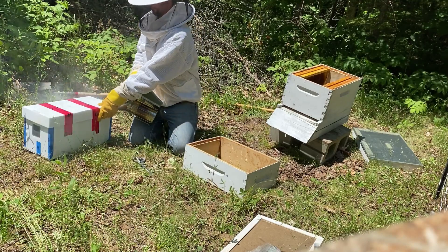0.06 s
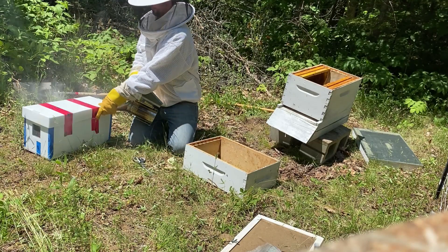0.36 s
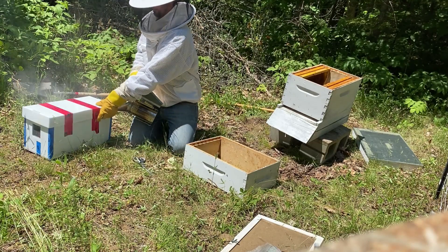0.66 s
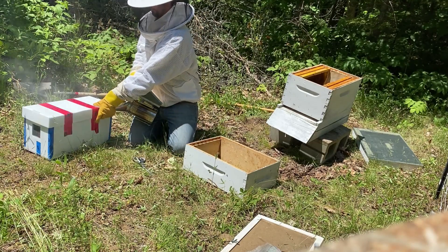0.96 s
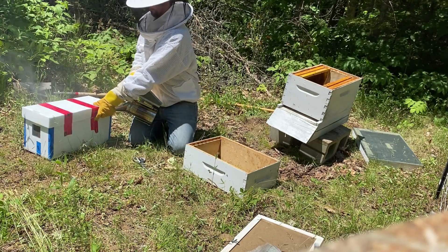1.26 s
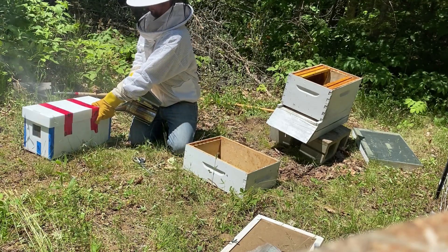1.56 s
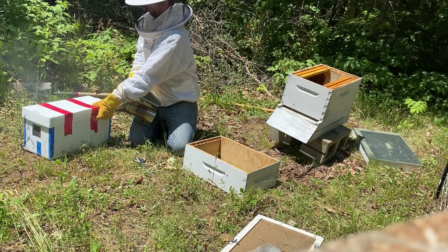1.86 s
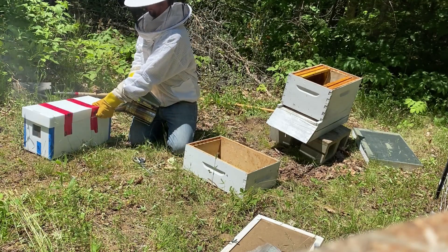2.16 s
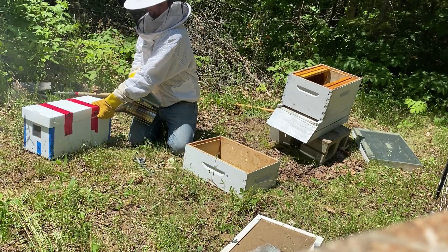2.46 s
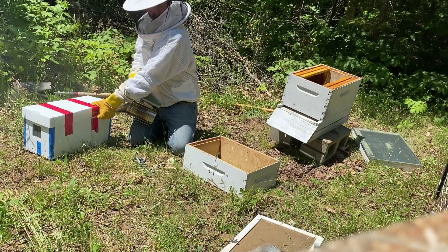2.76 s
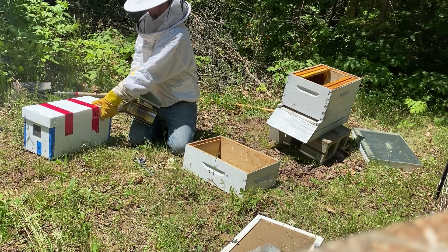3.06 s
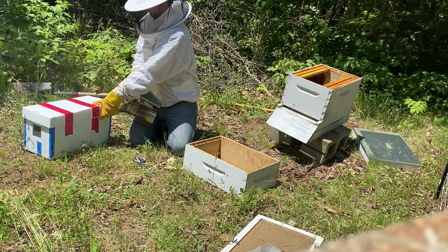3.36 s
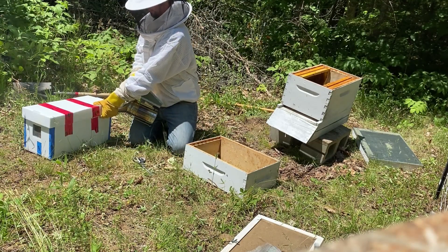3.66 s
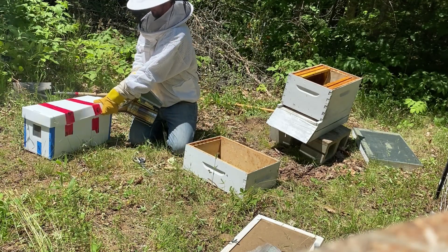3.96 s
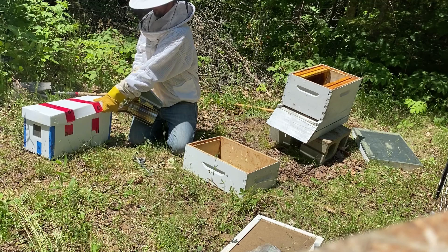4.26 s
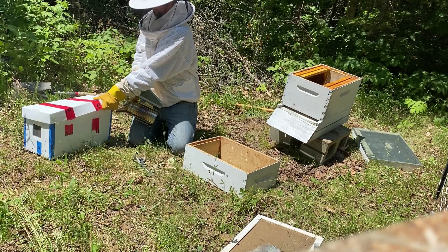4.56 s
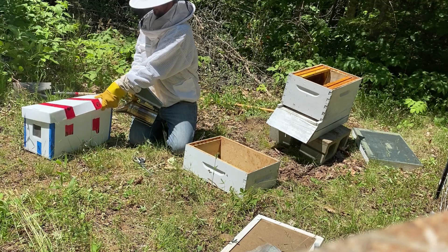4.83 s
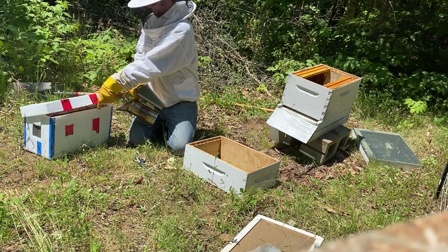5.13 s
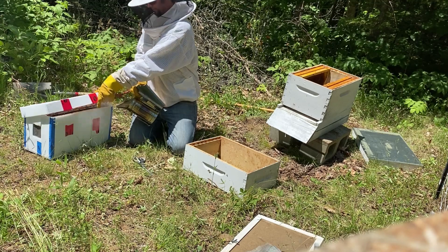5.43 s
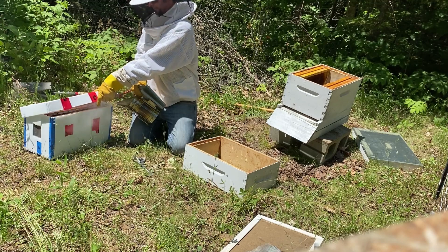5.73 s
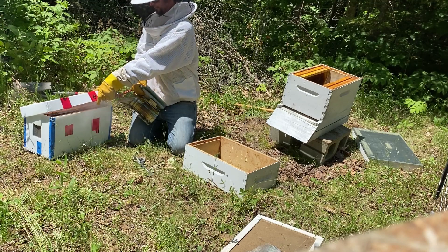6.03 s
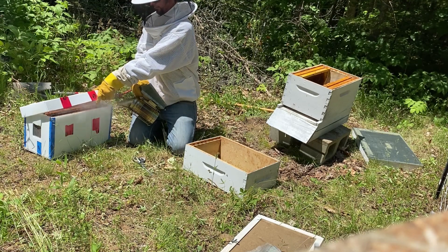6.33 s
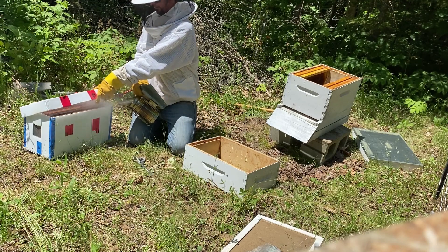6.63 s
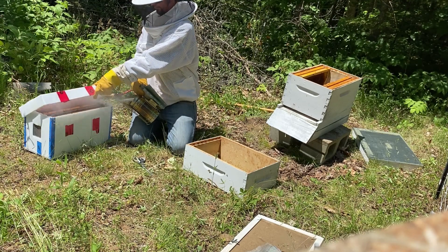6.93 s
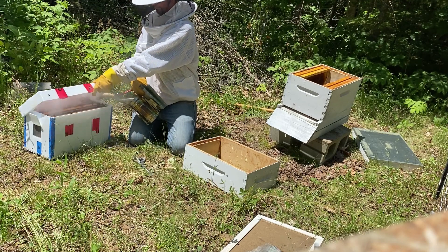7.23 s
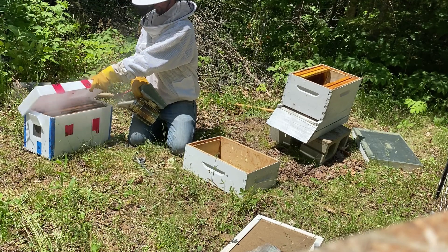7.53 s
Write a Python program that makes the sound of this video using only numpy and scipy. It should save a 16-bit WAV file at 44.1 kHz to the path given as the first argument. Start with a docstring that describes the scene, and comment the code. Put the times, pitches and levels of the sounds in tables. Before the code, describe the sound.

Bees hum softly and distant birds trill while tape crackles and a hive box lid is prised up with hollow knocks.

```python
"""The lid of a light hive box rubs, snaps and knocks as a beekeeper peels off its tape and prises it up.
Stick-slip friction shakes the panels, and each blow rings their damped modes. Inside, the wingbeats of
the colony make a hum that brightens as the gap widens; a smoker puffs a hissing jet of air into it.
At the edge of the wood one bird trills, another warbles and a distant buzzy phrase passes once,
all scattered by trunks and leaves over faint outdoor air."""
import sys
import numpy as np
from scipy import signal
from scipy.fft import rfft, irfft, next_fast_len
from scipy.io import wavfile
from scipy.ndimage import uniform_filter1d

SR = 44100
rng = np.random.default_rng(int(sys.argv[2]) if len(sys.argv) > 2 else 0)


def dump_mix(stems):
    """Bounce the given channels to the path in sys.argv[1] as a 16-bit WAV at rate SR."""
    frames = np.atleast_2d(stems).T  # one column per channel
    limited = np.clip(frames, -1, 1)  # hard clip at full scale
    pcm = np.round(limited * 32767).astype(np.int16)
    wavfile.write(sys.argv[1], SR, pcm)


N = 334719

# spectrum of the outdoor air: frequency_hz, gain_db
AIR_SPECTRUM = [(20, -22.5), (55, 1), (90, 0), (150, -3.5), (400, -10.5), (900, -20.5), (2000, -23),
                (4500, -31.5), (7500, -36), (15000, -48)]
# the part of the air that differs between the ears: frequency_hz, gain_db
AIR_SIDE_SPECTRUM = [(60, -10.5), (300, -2.5), (1500, 0.5), (6000, -8.0), (12000, -10.0)]
# colour of the hive's echo from the trees: frequency_hz, gain_db
ECHO_SPECTRUM = [(200, -8.5), (1500, -1.5), (5500, 4), (8000, -1.5), (15000, -9.5)]
# differences between the ears for the hive: frequency_hz, left_minus_right_db, left_lead_rad
EAR_DIFFERENCES = [(60, 3, .15), (248, 1.5, 0.29), (900, 4, 1.2), (2000, 2.5, 0.94), (3930, -3, 1.2),
                   (7680, -3.5, 2.33), (8900, 0, 1.57), (12200, -0.5, .1)]

# a buzzy phrase from deeper in the wood: time_s, pitch_hz, level_db
BUZZ_PHRASE = [(2.48, 4790, -69), (2.53, 5460, -64), (2.62, 5540, -66), (2.72, 5200, -63.5),
               (2.8, 5260, -70.5), (2.84, 4990, -89)]
# the warbler swoops to a pitch and back: turn_s, each_way_s, outer_hz, turn_hz, level_db
WARBLE_SWOOPS = [(0.586, 0.029, 5250, 3980, -67.5), (.81, 0.06, 4285, 2540, -61.5),
                 (1.42, 0.087, 4100, 2765, -63.5), (1.715, 0.086, 4480, 2326, -62.5),
                 (2.931, 0.083, 2490, 3563, -66.5), (4.006, 0.028, 3040, 4500, -59),
                 (4.305, .04, 2400, 3655, -65.5), (5.088, 0.034, 5500, 3370, -62),
                 (5.188, .062, 5240, 2800, -62.5), (7.274, .03, 3300, 4800, -72.5)]
# its downward slurs: start_s, length_s, first_hz, level_db
WARBLE_SLURS = [(0.611, 0.054, 5070, -69), (1.18, 0.1, 3750, -65), (1.796, 0.043, 4630, -60),
                (1.98, 0.058, 4850, -62), (2.055, .065, 3310, -66), (2.43, 0.037, 3160, -64),
                (4.065, 0.072, 2930, -64.5)]
# its held, barely gliding notes: start_s, length_s, first_hz, last_hz, level_db
WARBLE_HOLDS = [(1.53, 0.104, 3910, 3640, -64), (2.167, .085, 3850, 4420, -68.5),
                (2.356, 0.082, 3050, 2975, -66.5), (5.677, 0.22, 3300, 2846, -68),
                (6.441, 0.042, 4110, 3845, -67.5)]
# one syllable of the trill, a rise and a softer fall: time_s, pitch_hz, level_db
TRILL_SYLLABLE = [(0, 5100, 7), (.005, 5780, -2), (.011, 6090, 2), (.016, 6300, -9.5), (0.023, 6770, -11),
                  (.027, 6520, -39), (0.03, 6200, -20), (.037, 5500, -16), (.043, 5000, -18),
                  (.05, 4400, -18)]
# bouts of the trill: start_s, end_s, first_period_s, lengthening_per_period_s
TRILL_BOUTS = [(-.026, 2.09, .0922, .00017), (5.98, 7.56, .0908, 0)]
# one bout fades and the next swells: time_s, level_db
TRILL_ENVELOPE = [(0, -55.5), (1.2, -53.5), (2.05, -57), (5.98, -72), (6.4, -64.5), (6.85, -61.5),
                  (7.59, -60.5)]

# the colony heard through the walls: frequency_hz, gain_db
HUM_SPECTRUM = [(100, -12.5), (165, -4), (205, -2.5), (260, -3), (320, 1.5), (400, 1.5), (480, -5.5),
                (600, -10), (800, -21.5), (1500, -42)]
# course of that hum: time_s, level_db
HUM_ENVELOPE = [(0.0, -65.5), (0.59, -67), (3.21, -66.5), (3.8, -63.5), (4.57, -68), (5.39, -66),
                (6.47, -64.5), (6.66, -63.5), (7.59, -60)]
# the colony heard through the gap: frequency_hz, gain_db
SEETHE_SPECTRUM = [(300, 0), (600, 2), (750, -1), (950, 4), (1250, 5.5), (1650, -12.5), (2500, -12.5),
                   (5000, -23), (7500, -26.5), (15000, -46)]
# opening under the lid: time_s, share_of_full_gap
LID_OPENING = [(0, 0.18), (2.8, 0.13), (3.9, 0.41), (4.5, 0.095), (5.15, 0.16), (5.3, 0.4), (6.2, 0.42),
               (6.7, 0.83), (7.59, 0.96)]
# squeezes of the smoker's bellows: start_s, swell_s, level_db
BELLOWS_PUFFS = [(6.18, 0.14, -64), (6.55, 0.9, -65)]
# hiss of its nozzle: frequency_hz, gain_db
JET_SPECTRUM = [(500, -1), (1300, 9), (2500, 0), (5000, 4), (7500, -1), (10000, 1.5), (12000, -10),
                (14000, -5), (16000, -12.5)]

# pulls on the tape and brushes of the glove: start_s, hold_s, level_db
TAPE_PULLS = [(0, 0.013, -72.5), (0.41, 0.05, -66), (0.877, 0.95, -75.5), (1.261, 0.02, -63.5),
              (1.388, 0.12, -69), (2.358, 0.71, -72.5), (2.659, 0.11, -67.5), (3.817, 0.098, -63.5),
              (5.15, 0.048, -66)]
# crinkling tape and cloth: frequency_hz, gain_db
CRINKLE_SPECTRUM = [(800, -31), (2500, -1), (5500, 1), (7500, 1), (10000, -3.5), (14000, -4.5),
                    (16000, -7.5)]
# the loudest ticks of tape and dry stalks: time_s, level_db, centre_hz
LOUD_TICKS = [(1.4282, -34.5, 7830), (1.525, -38.5, 9000), (1.98, -37.5, 2700), (2.044, -45, 9000),
              (2.686, -38.5, 2500), (2.711, -41, 4500), (2.763, -36, 12000), (2.942, -40, 4000),
              (3.18, -45.5, 6000), (3.583, -43.5, 8000), (3.703, -40.5, 7750), (3.853, -30, 7000),
              (4.678, -38, 3450), (5.205, -29, 10400), (5.359, -53, 9200), (5.648, -39.5, 3000),
              (6.305, -44.5, 9000), (6.938, -40, 4500)]
# creaks of the lid: start_s, end_s, pitch_hz, level_db
LID_CREAKS = [(3.498, 3.522, 1520, -63), (5.565, 5.715, 1670, -74)]
# lid and glove rub on the box: start_s, end_s, groan_db, scratch_db
BOX_RUBS = [(0.419, 0.474, -45.5, -54.5), (1.01, 1.124, -62, -67.5), (1.798, 1.932, -56, -66),
            (1.943, 2.308, -63.5, -75), (3.015, 3.9, -69.5, -75), (3.467, 3.531, -55, -82),
            (5.154, 5.376, -56, -71), (5.519, 5.766, -56, -71), (5.86, 6.057, -55, -77),
            (6.467, 7.147, -58, -82)]
# response of the rubbed panels: frequency_hz, gain_db
GROAN_SPECTRUM = [(40, -11), (80, -5), (145, -6), (245, 3), (330, -4.5), (480, -8), (900, -34.5),
                  (3000, -57)]
# scratching on their surface: frequency_hz, gain_db
SCRATCH_SPECTRUM = [(400, 2), (1000, 6.5), (1700, 3.5), (2500, 1), (4500, -2), (8000, -11.5), (15000, -43)]
# the lid snapping past the rim: frequency_hz, gain_db
SNAP_SPECTRUM = [(500, -11), (1200, 1.5), (2500, -7), (3700, -3.5), (5700, -0.5), (7500, -4.5), (11000, -7),
                 (14000, -16), (16000, -5)]
# normal modes of the box: frequency_hz, level_db, t60_s
BOX_MODES = [(102, -21, 0.25), (184.4, 0.5, 0.11), (199, -24, .08), (238.5, -4, .09), (305.5, 2, 0.048),
             (329.6, 2.5, 0.04), (374.4, -3.5, 0.068), (438, -15, 0.028), (475, -19, 0.11),
             (560, -14.5, 0.043), (655.5, -8, 0.044), (690, -14, 0.063), (770, -20, 0.043),
             (968, -2.5, 0.025), (1160, -11, 0.027), (1390, -10, 0.017), (1580, -21, 0.012),
             (1730, -15.5, 0.016), (2225, -20.5, 0.022), (2600, -13.5, 0.013)]
# blows on the box: time_s, force_db, snap_db, rebound_db, bent_panel_pitch_ratio
BOX_BLOWS = [(0.4256, -47, -40, -55, 1.21), (.452, -38, -15, -29, 1.32), (1.145, -25.5, -56, -43, 1.084),
             (1.177, -39, -40, -49, 1.01), (1.452, -46, -60, -55, 0.9), (1.887, -46.5, -39.5, -50, .95),
             (1.978, -43.5, -46, -66, 1.07), (2.268, -45, -58, -52, 1), (2.3993, -32, -37, -57, 1.31),
             (3.099, -51.5, -66, -60, 0.88), (3.482, -59, -35, -59, .95), (3.507, -60, -45, -62, 1.28),
             (3.841, -47, -34, -58, 1.03), (3.8676, -17, -5.5, -48, 0.98), (5.2048, -36.5, -32, -40, 1),
             (6.902, -48.5, -29.5, -51, 0.89)]


def from_db(db):
    return 10 ** (np.asarray(db) / 20)


def unit_rms(x):
    return x / np.sqrt(np.mean(x ** 2) + 1e-20)


def seconds(length_s):
    return np.arange(int(length_s * SR)) / SR


def in_time(rows):
    """Each column of a curve, interpolated sample by sample."""
    times, *columns = np.transpose(rows)
    return [np.interp(np.arange(N) / SR, times, column) for column in columns]


def at_hz(rows, hz, column=1):
    """A column interpolated along a logarithmic frequency axis."""
    rows = np.array(rows)
    return np.interp(np.log(hz + 1e-3), np.log(rows[:, 0]), rows[:, column])


def add(track, start_s, sound):
    """Superposition: a sound joins the track at its start time."""
    start = round(start_s * SR)
    part = sound[max(-start, 0):N - start]
    track[max(start, 0):max(start, 0) + len(part)] += part


def filtered(x, response):
    """Linear filtering: the spectrum is multiplied by a function of frequency."""
    size = next_fast_len(x.shape[-1] + 4096)
    hz = np.fft.rfftfreq(size, 1 / SR)
    return irfft(rfft(x, size) * response(hz), size)[..., :x.shape[-1]]


def coloured(x, spectrum):
    return filtered(x, lambda hz: from_db(at_hz(spectrum, hz)))


def drift(per_s):
    """Random modulation of unit RMS, linear between Gaussian values."""
    knots = rng.standard_normal(int(per_s * N / SR) + 2)
    return unit_rms(np.interp(np.arange(N) * per_s / SR, np.arange(len(knots)), knots))


def grains(per_s, spread_db):
    """Shot noise: tiny slips of very unequal size at random moments."""
    sizes = from_db(spread_db * np.minimum(rng.exponential(1, N), 5)) * rng.choice([-1, 1], N)
    return unit_rms(sizes * (rng.random(N) < per_s / SR))


def stroke(start_s, end_s):
    """The tapered envelope of one hand movement."""
    return signal.windows.tukey(max(int((end_s - start_s) * SR), 2), 0.24)


def push(attack_s, hold_s, release_db_per_s):
    """Effort builds linearly, holds and decays exponentially."""
    t = seconds(attack_s + hold_s + 1)
    released_s = np.maximum(t - attack_s - hold_s, 0)
    return np.minimum(t / attack_s, 1) * from_db(-release_db_per_s * released_s)


def from_left(x):
    """Interaural phase and level differences: the box stands left, so that ear hears it first."""
    half = np.array([[.5], [-.5]])

    def response(hz):
        gain = from_db(half * at_hz(EAR_DIFFERENCES, hz))
        return gain * np.exp(1j * half * at_hz(EAR_DIFFERENCES, hz, column=2))
    return filtered(x, response)


def tree_scatter(x, t60_s, build_s):
    """Multiple scattering by trunks and leaves gives a decaying tail, different at each ear."""
    t = seconds(1.2)
    tail = rng.standard_normal((2, len(t))) * from_db(-60 * t / t60_s) * (1 - np.exp(-t / build_s))
    tail /= np.sqrt(np.sum(tail ** 2, axis=1, keepdims=True))
    return signal.fftconvolve(x[None], tail, axes=1)[:, :N]


def outdoor_air():
    """Partly coherent noise: faint air, alike at both ears in the bass."""
    mid, side = rng.standard_normal((2, N))
    side = coloured(side, AIR_SIDE_SPECTRUM)
    return from_db(-68) * unit_rms(coloured(mid + side * [[1], [-1]], AIR_SPECTRUM))


def buzzing_bird(swing_hz=750, swings_per_s=55):
    """Fast frequency modulation makes a buzz, so far off that only scattered sound arrives."""
    t = np.arange(N) / SR
    centre_hz, db = in_time(BUZZ_PHRASE)
    hz = centre_hz + swing_hz * np.sin(2 * np.pi * swings_per_s * t) + 200 * drift(150)
    singing = (t >= BUZZ_PHRASE[0][0]) & (t <= BUZZ_PHRASE[-1][0] + .02)
    envelope = from_db(db) * uniform_filter1d(singing * 1., size=900)
    song = envelope * np.sin(2 * np.pi * np.cumsum(hz) / SR)
    return tree_scatter(song, t60_s=0.4, build_s=0.0049) * from_db([[-1], [3]])


def whistle(hz, amplitude, burr):
    """Random frequency modulation roughens a bird's pure tone; burr is the relative deviation."""
    quaver = unit_rms(uniform_filter1d(rng.standard_normal(len(hz)), size=90))
    phase = 2 * np.pi * np.cumsum(hz * (1 + burr * quaver)) / SR
    return amplitude * signal.windows.tukey(len(hz), .2) * np.sin(phase)


def warbled_notes(turn_roundness=1.2, slur_ratio=.77):
    """Frequency glides: start, pitch course and level of each swoop, slur and held note."""
    for turn_s, way_s, outer_hz, turn_hz, db in WARBLE_SWOOPS:
        from_turn = np.abs(seconds(2 * way_s) / way_s - 1)
        yield turn_s - way_s, turn_hz * (outer_hz / turn_hz) ** (from_turn ** turn_roundness), db
    for start_s, length_s, first_hz, db in WARBLE_SLURS:
        yield start_s, first_hz * slur_ratio ** (seconds(length_s) / length_s), db
    for start_s, length_s, first_hz, last_hz, db in WARBLE_HOLDS:
        yield start_s, first_hz + (last_hz - first_hz) * seconds(length_s) / length_s, db


def warbling_bird(db_per_octave=7, upstroke_db=2.5, flutter_db=2.5):
    """Amplitude follows frequency: fluttering notes are sung harder when high and when rising."""
    song = np.zeros(N)
    for start_s, hz, db in warbled_notes():
        rising = uniform_filter1d((np.gradient(hz) > 0) * 1., size=300)
        effort_db = db_per_octave * np.log2(hz / hz.mean()) + upstroke_db * rising
        add(song, start_s, whistle(hz, from_db(db - 3 + effort_db), burr=0.02226))
    song *= from_db(flutter_db * drift(120))
    leaves = tree_scatter(song, t60_s=0.039, build_s=0.0016)   # nearby foliage smears each note
    trees = tree_scatter(song, t60_s=0.79, build_s=0.02)
    return song * from_db([[-4.5], [-.5]]) + from_db(-4.5) * leaves + trees * from_db([[.5], [2.5]])


def trill_beats(uneven_db=.8):
    """Start and level of each syllable: a periodic beat that slows in the first bout as the bird tires."""
    for start_s, end_s, period_s, lengthening_s in TRILL_BOUTS:
        while start_s < end_s:
            yield start_s, np.interp(start_s, *np.transpose(TRILL_ENVELOPE)) + uneven_db * rng.normal()
            start_s += period_s
            period_s += lengthening_s


def trilling_bird(flattening_per_db=0.00368):
    """A train of chirps: softer ones are lower in pitch and have a lower direct-to-reverberant ratio."""
    times, hz, shape_db = np.transpose(TRILL_SYLLABLE)
    t = seconds(times[-1])
    facing, scattered = np.zeros((2, N))
    for start_s, db in trill_beats():
        pitch_ratio = 1 + flattening_per_db * min(db + 57.0, 0) + rng.normal(0, 0.0053)
        tilt_db = rng.normal(0, 1.3) + .5 * (db + 70.5)   # the downstroke comes and goes
        amplitude = from_db(db + np.interp(t, times, shape_db) + tilt_db * t / times[-1])
        note = whistle(pitch_ratio * np.interp(t, times, hz), amplitude, burr=0.014)
        add(facing, start_s, note)
        add(scattered, start_s, note * from_db(-.3 * (db + 49.0)))
    direct = facing * from_db([[-11], [3]]) * [[-1], [1]]   # from the right, the ears half a cycle apart
    return direct + tree_scatter(scattered, t60_s=0.43, build_s=0.002) * from_db([[-8], [-2]])


def wings(wing_hz=205, spread=.11, bees=14):
    """Incoherent sum: each bee's wandering wingbeat is a pulse train, over a rush of air."""
    sawtooths = np.zeros(N)
    for _ in range(bees):
        beat_hz = wing_hz * np.exp(spread * rng.normal() + .04 * drift(9))
        sawtooths += (np.cumsum(beat_hz) / SR % 1 - .5) * from_db(3.84 * drift(6))
    pulses = np.diff(sawtooths, prepend=sawtooths[0])
    return unit_rms(pulses) + 0.86 * rng.standard_normal(N)


def colony(hum_gain_db=3, full_gap_db=-64.5):
    """Two transmission paths: the walls pass a dull hum, the gap under the lid a brighter seething."""
    (hum_db,), (gap,) = in_time(HUM_ENVELOPE), in_time(LID_OPENING)
    hum = from_db(hum_db + hum_gain_db) * unit_rms(coloured(wings(), HUM_SPECTRUM))
    seethe = gap * from_db(full_gap_db) * unit_rms(coloured(wings(), SEETHE_SPECTRUM))
    return hum + seethe


def smoker(flutter_db=2.1):
    """Jet noise: the bellows push a smooth hiss of air through the nozzle."""
    flow = np.zeros(N)
    for start_s, swell_s, db in BELLOWS_PUFFS:
        add(flow, start_s, from_db(db) * push(swell_s, hold_s=0.047, release_db_per_s=60))
    flow *= from_db(flutter_db * drift(25))
    return flow * unit_rms(coloured(rng.standard_normal(N), JET_SPECTRUM))


def tape_rustle(lingering_db=-89, attack_s=0.019):
    """Modulated shot noise: tape and cloth crinkle in clumps of fine grains."""
    envelope = np.full(N, from_db(lingering_db))
    for start_s, hold_s, db in TAPE_PULLS:
        add(envelope, start_s, from_db(db) * push(attack_s, hold_s, release_db_per_s=158))
    clumps = grains(5000, spread_db=3.0) * from_db(2.0 * drift(70))
    return envelope * unit_rms(coloured(clumps, CRINKLE_SPECTRUM))


def crack(splinter_db, t60_s):
    """Sudden release of stress: an impulse, then a brief decay of splinters."""
    t = seconds(.05)
    burst = from_db(splinter_db - 60 * t / t60_s) * rng.standard_normal(len(t))
    burst[0] = 1
    return burst


def ticks(faint_per_s=4.4, faint_hz=7930):
    """Cracks of tape and stalks each excite a broad resonance; faint ones form a Poisson process."""
    times = np.cumsum(rng.exponential(1, size=60)) / faint_per_s
    faint = [(time_s, -57 - 1.5 * softness, faint_hz * 2 ** (.5 * np.tanh(colour)))
             for time_s, (softness, colour) in zip(times, rng.standard_normal((60, 2)))
             if time_s < N / SR]
    out = np.zeros(N)
    for time_s, db, hz in list(LOUD_TICKS) + faint:
        band = signal.butter(1, [hz / 1.5, min(hz * 1.5, .45 * SR)], "band", fs=SR)
        add(out, time_s, from_db(db + 3.5) * signal.lfilter(*band, crack(splinter_db=-10.5, t60_s=0.012)))
    return out


def lid_creaks(bandwidth_hz=130):
    """Uneven slips of the lid's edge drive one narrow resonance."""
    out = np.zeros(N)
    for start_s, end_s, hz, db in LID_CREAKS:
        resonance = signal.iirpeak(hz, hz / bandwidth_hz, fs=SR)
        ringing = unit_rms(signal.lfilter(*resonance, grains(250, spread_db=1.5)))
        swell = stroke(start_s, end_s)
        add(out, start_s, from_db(db) * swell * ringing[:len(swell)])
    return out


def lid_rubbing():
    """Stick-slip friction shakes the panels and scratches their surface."""
    groan, scratch = np.zeros((2, N))
    for start_s, end_s, groan_db, scratch_db in BOX_RUBS:
        add(groan, start_s, from_db(groan_db) * stroke(start_s, end_s))
        add(scratch, start_s, from_db(scratch_db) * stroke(start_s, end_s))
    panels = coloured(grains(600, spread_db=2.5), GROAN_SPECTRUM)
    surface = coloured(grains(1100, spread_db=4.5), SCRATCH_SPECTRUM)
    return groan * unit_rms(panels) + scratch * unit_rms(surface)


def box_ring(low_db, middle_db, high_db, pitch_ratio, delay_cycles=0.37):
    """Dispersion: bending waves are slower at low frequency, so the deep modes arrive and swell last."""
    t, out = seconds(0.25), 0
    blow_spectrum = [(210, low_db), (360, middle_db), (950, high_db)]
    for rest_hz, mode_db, t60_s in BOX_MODES:
        hz = rest_hz * pitch_ratio
        strength_db = at_hz(blow_spectrum, hz) + mode_db + rng.normal(0, 1)
        age_s = np.maximum(t - delay_cycles / hz, 0)
        envelope = from_db(strength_db - 60 * age_s / t60_s) * (1 - np.exp(-age_s * hz))
        out = out + envelope * np.sin(2 * np.pi * hz * age_s)
    return out


def lid_knocks(rebound_s=.0085, stiffening_db=51, hardness_share=0.37):
    """Impact excitation: the lid snaps past the rim, the panels ring and spring back once."""
    body, snaps = np.zeros((2, N))
    for start_s, force_db, snap_db, rebound_db, pitch_ratio in BOX_BLOWS:
        blow = (start_s, force_db, snap_db)
        rebound = (start_s + rebound_s, rebound_db, snap_db - 19)
        for time_s, db, crack_db in (blow, rebound):
            low_db = db - stiffening_db * (pitch_ratio - 1)   # bending a panel weakens its deep modes
            high_db = db - 7.5 + hardness_share * (crack_db - db)   # high modes follow the snap
            add(body, time_s, box_ring(low_db, db, high_db, pitch_ratio))
            snap = crack(splinter_db=-3.5, t60_s=0.00079) + crack(splinter_db=-16, t60_s=0.04)
            add(snaps, time_s, from_db(crack_db) * snap)
    return body, coloured(snaps, SNAP_SPECTRUM) * from_db(-2)


def scene():
    """Superposition of the hive's direct sound, its echo from the trees, the birds and the air."""
    body, snaps = lid_knocks()
    sharp = snaps + ticks() + lid_creaks()
    sustained = colony() + lid_rubbing() + tape_rustle() + smoker()
    scattered = from_db(-25) * body + from_db(-17) * sharp + from_db(-14) * sustained
    echo = coloured(tree_scatter(scattered, t60_s=0.44, build_s=0.0094), ECHO_SPECTRUM)
    birds = trilling_bird() + warbling_bird() + buzzing_bird()
    return from_left(body + sharp + sustained) + echo + birds + outdoor_air()


def record(dry):
    """Band limiting: a gentle high-pass at 38 Hz and a steep low-pass at 15.6 kHz."""
    thinned = signal.sosfilt(signal.butter(2, 38, "high", fs=SR, output="sos"), dry)
    return signal.sosfilt(signal.ellip(10, .1, 70, 15600, fs=SR, output="sos"), thinned)


dry = scene()
out = record(dry)
dump_mix(out)
```